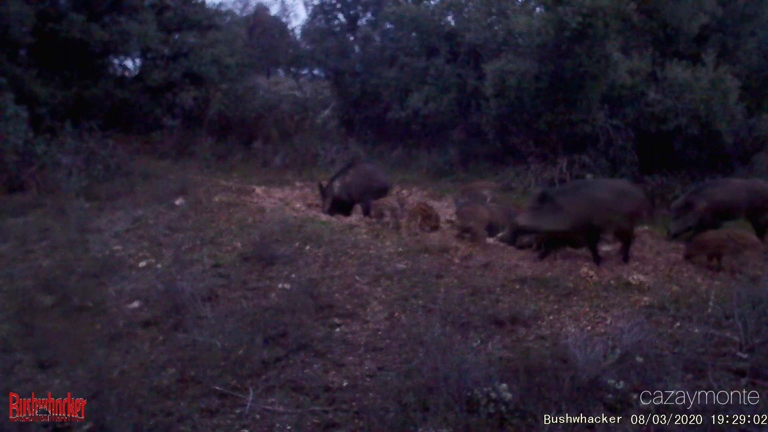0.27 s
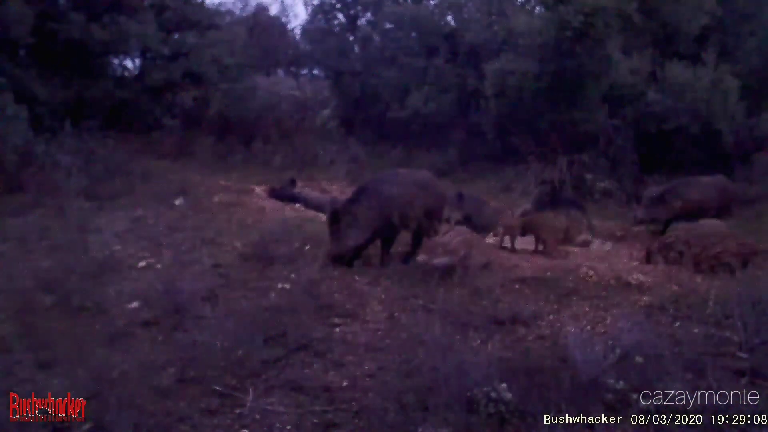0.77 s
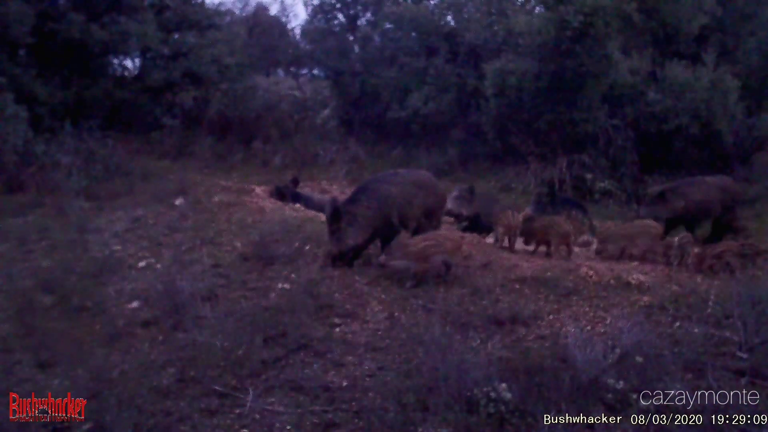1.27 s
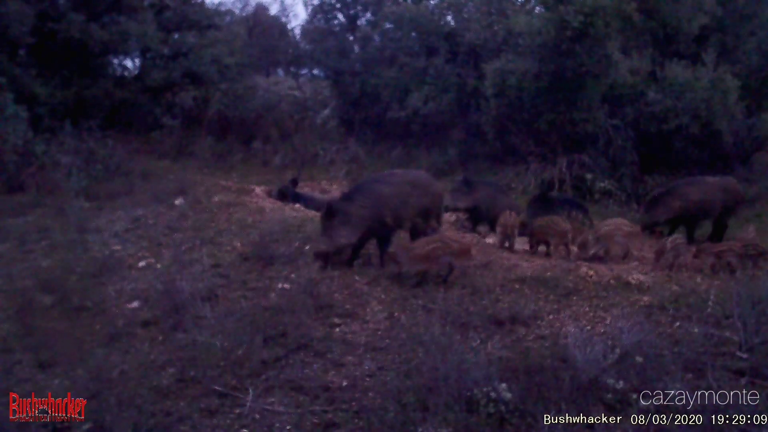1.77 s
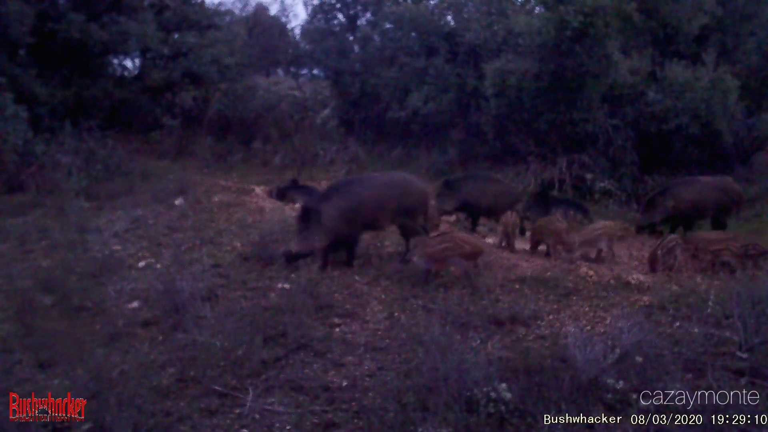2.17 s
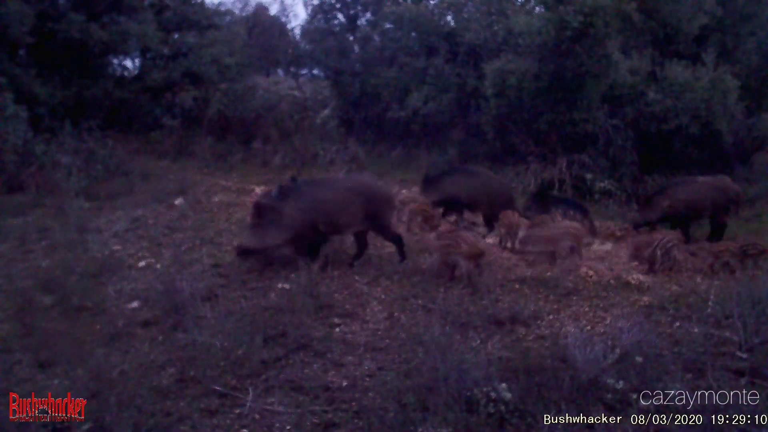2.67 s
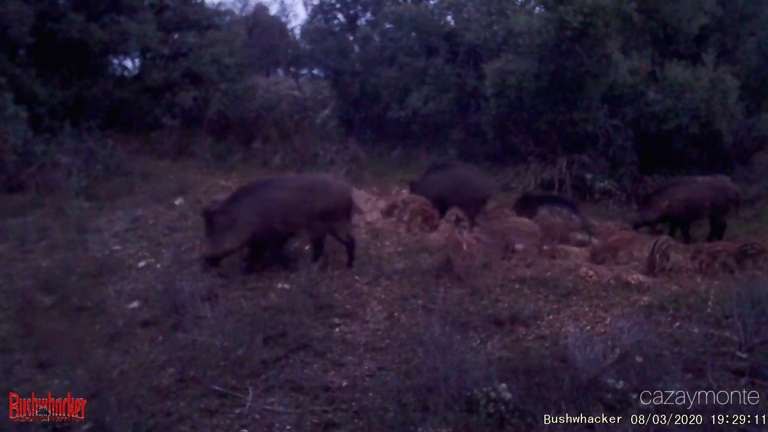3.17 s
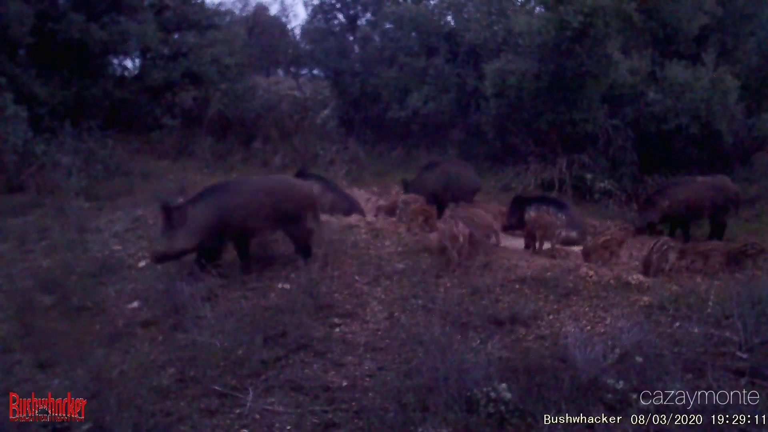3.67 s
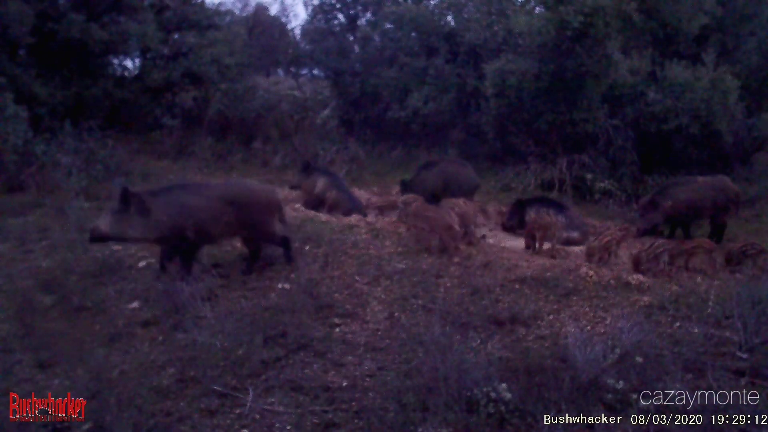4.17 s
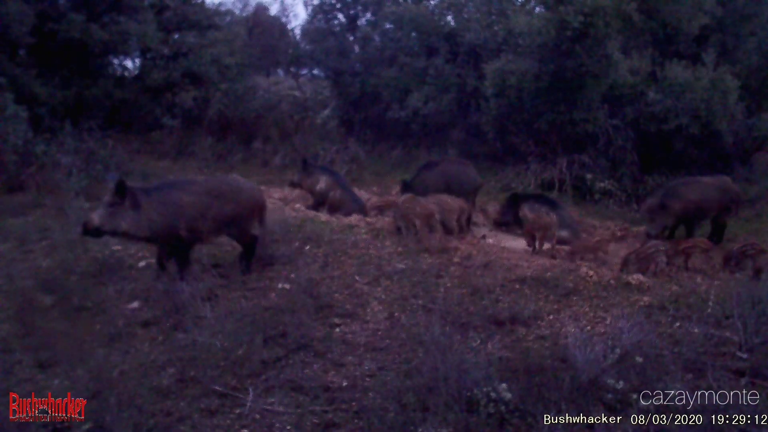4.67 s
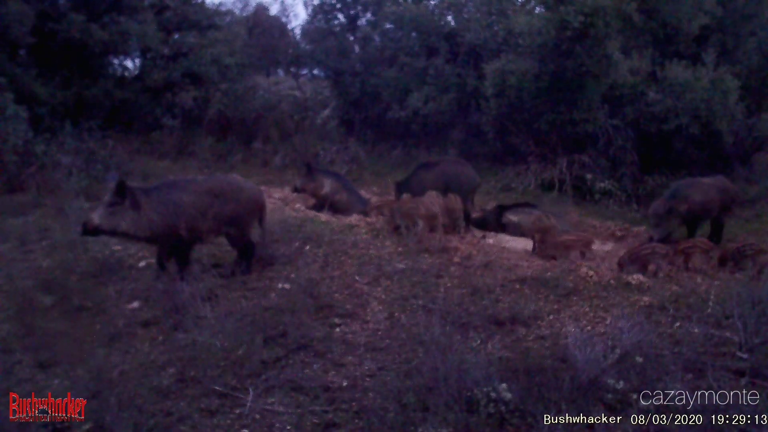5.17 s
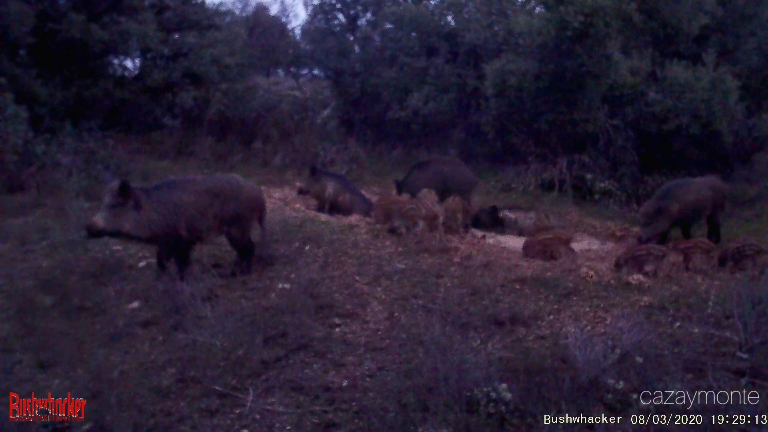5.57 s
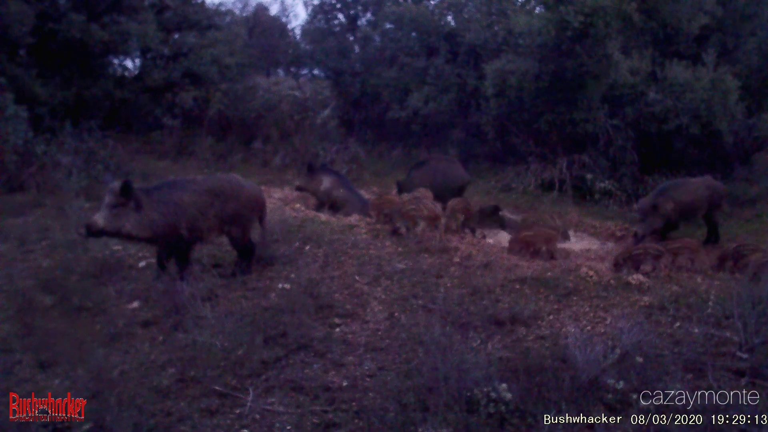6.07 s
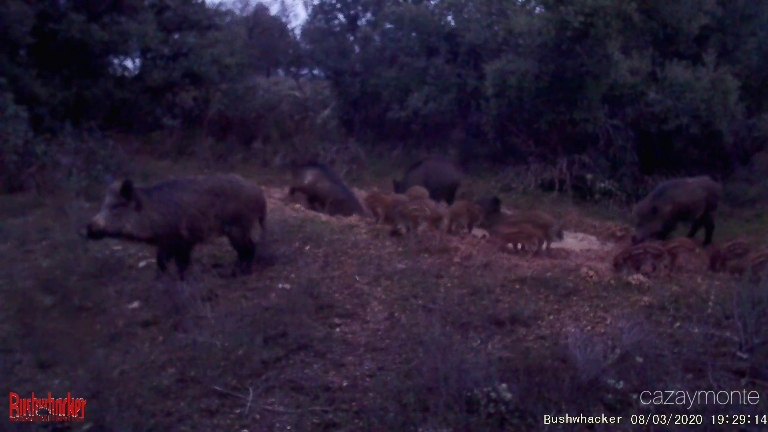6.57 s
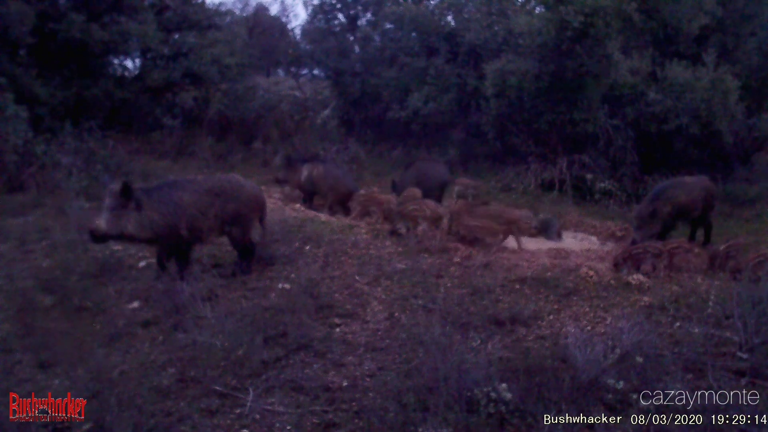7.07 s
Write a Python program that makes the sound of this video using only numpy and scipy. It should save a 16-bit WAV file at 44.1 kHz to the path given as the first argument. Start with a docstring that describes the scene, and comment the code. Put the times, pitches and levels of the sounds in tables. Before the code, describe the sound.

A still evening outdoors, with steady soft microphone hiss beneath a herd of wild boars and piglets stirring a mud hole some way off. It begins with faint wet shuffling and light ticks; around 0.65 s a small sucking squeak rises. At 1.0 to 1.3 s hooves or snouts make a sharp cluster of smacks, plops and sloshes. It calms, then mud squelches and snaps again around 2.2 to 2.5 s. Scattered spatters and drips follow, with a faint, husky low call at 3.3 s and more small smacks near 4 s. A short low grunt falls in pitch at 4.7 s. Wet crackling thickens after 5 s. About 5.85 to 6.1 s one animal heaves through the water with the loudest splash and smack, ebbing into gurgles. A breathy, hissing snort blows at roughly 6.75 to 7 s, then a few last plops and spatters.

```python
"""Wild boars in a mud hole

Wild boars and piglets wallow some way from a trail camera, on a still evening.
Hooves and snouts churn the water: swarms of damped rings and shaped noise gurgle, crackle and spatter.
Mud smacks as torn noise in a small cavity and plops as short unsteady tones; one animal heaves through the water.
Another snorts, noise ringing throat and nose; mud and a low grunt slide in pitch, and a faint call holds its own.
The thicket returns a short echo, and the camera's single microphone adds a steady hiss."""
import sys
import numpy as np
from scipy import signal
from scipy.fft import rfft, irfft, next_fast_len
from scipy.io import wavfile
from scipy.ndimage import map_coordinates

SR = 44100
rng = np.random.default_rng(int(sys.argv[2]) if len(sys.argv) > 2 else 0)


def generate_wav(signal):
    """Clip the signal to [-1, 1] and save it as 16-bit WAV at the path in sys.argv[1]."""
    frames = np.transpose(np.atleast_2d(signal))
    scaled = np.clip(frames, -1, 1) * 32767
    pcm = np.round(scaled).astype(np.int16)
    wavfile.write(sys.argv[1], SR, pcm)


N = 321930


def amp(db):
    """Decibels to gain."""
    return 10 ** (np.asarray(db) / 20)


def unit(x):
    """Scale to rms 1."""
    return x / np.sqrt(np.mean(x ** 2) + 1e-20)


def curves(rows):
    """One value per sample for each column after the time."""
    s, *columns = np.transpose(rows)
    return [np.interp(np.arange(N) / SR, s, column) for column in columns]


def noise(size=N):
    """White noise at rms 1."""
    return rng.standard_normal(size)


def wobble(rate, size=N):
    """A smooth random curve, rate knots a second."""
    knots = rng.standard_normal(int(size * rate / SR) + 4)
    return map_coordinates(knots, [np.arange(size) * rate / SR])


def filtered(x, response):
    """x times a response of frequency, padded so that its ringing does not wrap round."""
    m = next_fast_len(len(x) + SR // 10)
    f = np.fft.rfftfreq(m, 1 / SR)
    return irfft(rfft(x, m) * response(f), m)[:len(x)]


def coloured(x, spectrum):
    """x shaped by (frequency [Hz], level [dB]) points on a log axis, at rms 1."""
    hz, db = np.transpose(spectrum)
    return unit(filtered(x, lambda f: amp(np.interp(np.log(f + 1), np.log(hz), db))))


def resonance(f, hz, width):
    """Response of one damped resonator."""
    return 1j * f * width / (hz * hz - f * f + 1j * f * width)


def fade(t, t60):
    """Exponential decay by 60 dB in t60 seconds."""
    return np.exp(-np.log(1000) * t / t60)


def settling(t, length, attack, t60):
    """Build up from t = 0 with time constant attack, hold for length, then die away."""
    build_up = 1 - np.exp(-np.maximum(t, 0) / attack)
    return build_up * fade(np.maximum(t - length, 0), t60)


def add(track, s, sound):
    """Mix a sound into the track at time s."""
    part = track[round(s * SR):][:len(sound)]
    part += sound[:len(part)]


def bubbles(rate, low_hz, high_hz, cycles, rise, spread_db, size):
    """A swarm of damped rings of random pitch and strength; with rise, each climbs as its bubble nears the surface."""
    when, pitch, life, strength = rng.random((int(rate * N / SR), 4)).T[:, :, None]
    hz = low_hz * (high_hz / low_hz) ** pitch
    t = np.arange(size) / SR
    t60 = cycles * (.5 + life) / hz
    ring = np.sin(2 * np.pi * hz * t * (1 + rise * t / t60)) * fade(t, t60)
    gain = amp(spread_db * strength ** 2) * np.sqrt(hz)
    places = (when * N).astype(int) + np.arange(size)
    return np.bincount(places.ravel(), (gain * ring).ravel(), N)[:N]


# the quiet of the wood and the microphone's hiss: (frequency [Hz], relative level [dB per Hz])
QUIET_SPECTRUM = [(20, -0.5), (130, -4), (300, -10), (850, -16), (1050, -19.5), (3500, -20.5),
                  (6500, -21.5), (9000, -20.5), (15500, -23.5)]


def quiet(level_db=-66.0):
    """Steady noise shaped like the still wood and the microphone's own hiss."""
    return amp(level_db) * coloured(noise(), QUIET_SPECTRUM)


def thicket(x, t60=0.16):
    """Ground and bushes scatter a short echo, a decaying noise tail."""
    t = np.arange(SR // 2) / SR
    tail = noise(len(t)) * fade(t, t60)
    return signal.fftconvolve(x, tail / np.linalg.norm(tail))[:N]


# a faint, low call held on one pitch: attack is a time constant, fade the time to fall by 60 dB
CALL_START_S, CALL_HOLD_S, CALL_ATTACK_S, CALL_FADE_S = 3.315, 0.043, 0.016, 0.6
CALL_HZ, CALL_DB = 367, -66  # both before a random waver


def low_call(waver=0.034, flutter_db=4.0):
    """A soft, husky tone that swells and dies away; random waver of pitch and level makes it husky."""
    t = np.arange(N) / SR
    hz = CALL_HZ * (1 + waver * wobble(150))
    phase = 2 * np.pi * np.cumsum(hz) / SR
    envelope = settling(t - CALL_START_S, CALL_HOLD_S, CALL_ATTACK_S, CALL_FADE_S)
    return amp(CALL_DB + flutter_db * wobble(60)) * envelope * np.sin(phase)


# sucking mud and a low grunt (at 4.719 s), sliding in pitch:
# (time [s], length [s], starting pitch [Hz], final pitch [Hz], level before the swell [dB])
PITCH_GLIDES = [(0.648, 0.057, 858, 1624, -56), (2.218, 0.017, 720, 1110, -53),
                (2.253, 0.025, 1250, 1730, -55.5), (3.122, 0.052, 1990, 1053, -58.5),
                (3.905, 0.04, 835, 2250, -60.5), (4.719, 0.042, 330, 190, -54),
                (4.783, .04, 1760, 2000, -63), (4.88, 0.029, 856, 824, -56)]


def glides(waver=0.048, flutter_db=3):
    """Sucking mud and a low animal grunt: soft, fluttering tones that swell, slide and waver."""
    out = np.zeros(N)
    for s, length, from_hz, to_hz, db in PITCH_GLIDES:
        u = np.linspace(0, 1, int(length * SR))
        slide_hz = from_hz + (to_hz - from_hz) * u
        hz = slide_hz * (1 + waver * wobble(254)[:len(u)])
        swell = np.sin(np.pi * u) * unit(amp(flutter_db * wobble(138)[:len(u)]))
        add(out, s, amp(db) * swell * np.sin(2 * np.pi * np.cumsum(hz) / SR))
    return out


def blown(resonances):
    """Turbulent air ringing a set of resonances, added with alternating sign, at rms 1."""
    def tract(f):
        return sum((-1) ** k * amp(db) * resonance(f, hz, width)
                   for k, (hz, width, db) in enumerate(resonances))
    return unit(filtered(noise(), tract))


# one blow of air through the snout; the level is a gain on throat and hiss together
SNORT_START_S, SNORT_DB = 6.752, -34
SNORT_ATTACK_S, SNORT_HOLD_S, SNORT_RELEASE_S = 0.077, 0.032, 0.14
# throat resonances before they shift with its tightening: (frequency [Hz], width [Hz], level [dB])
THROAT_RESONANCES = [(303, 204, -5), (860, 74, 3.5), (1526, 133, 0.5), (2250, 240, -1), (3130, 80, -3),
                     (3460, 88, -2)]
# resonances of the narrow nasal passages, before the quiver: (frequency [Hz], width [Hz], level [dB])
NOSE_RESONANCES = [(4100, 71, -3.5), (4660, 115, 3), (5340, 140, 1), (5765, 260, -1), (7100, 174, 0.5),
                   (7500, 165, 0.5), (8570, 300, 2.5), (10850, 220, -13)]
# air hissing at the nostrils: (frequency [Hz], relative level [dB per Hz])
NOSTRIL_SPECTRUM = [(100, -25), (300, -18), (1100, -14), (4000, -1), (6500, 8.5), (10000, -2.5),
                    (13000, -9), (16000, -26)]


def snort(bend=0.0061, tighten=.085, brighten=0.24):
    """A boar clears its snout: unvoiced air rings the tightening throat and the nose, and hisses at the nostrils."""
    t = np.arange(N) / SR
    knees = SNORT_START_S + np.cumsum([0, SNORT_ATTACK_S, SNORT_HOLD_S, SNORT_RELEASE_S])
    blow = np.sin(np.pi / 2 * np.interp(t, knees, [0, 1, 1, 0])) ** 2
    # the soft walls quiver, and the throat's resonances climb through the blow
    quiver = 1 + bend * wobble(30)
    climb = tighten * np.interp(t, [knees[0], knees[2], knees[3]], [-1, 0, 1])
    # reading the noise at a varying speed shifts its resonances
    throat = map_coordinates(blown(THROAT_RESONANCES), [np.cumsum(quiver + climb)], mode="mirror")
    nose = map_coordinates(blown(NOSE_RESONANCES), [np.cumsum(quiver)], mode="mirror")
    nostrils = coloured(noise(), NOSTRIL_SPECTRUM)
    # nose and nostrils grow faster than the throat, so the peak of the blow is brightest
    hiss = (amp(-4.5) * nose + amp(-8.0) * nostrils) * blow ** brighten
    flutter = amp(0.96 * wobble(250))
    return amp(SNORT_DB) * blow * flutter * (amp(-6.5) * throat + hiss)


# the herd's constant shuffling in the mud: (time [s], spatter level [dB])
SHUFFLING = [(0, -66.5), (.85, -72.5), (1.5, -67), (2.05, -66.5), (2.7, -63), (3.75, -67), (4.25, -71.5),
             (4.95, -60), (5.8, -63), (6.6, -63), (7.3, -59)]
SHUFFLE_WATER_DB = -7  # its slosh, relative to its spatter
# a hoof or snout pushes through the mud:
# (time [s], length [s], sloshing water level [dB], spattering mud level [dB])
MUD_STROKES = [(0.185, 0.05, -67.5, -59.5), (0.593, 0.099, -64, -58.5), (0.97, 0.012, -56, -55),
               (1.035, 0.076, -56, -53), (1.128, 0.045, -51, -47.5), (1.256, 0.032, -55.5, -52),
               (2.15, 0.12, -64.5, -57.5), (2.295, 0.021, -56, -43.5), (2.372, 0.028, -52.5, -45),
               (2.412, 0.083, -64.5, -53.5), (2.556, 0.019, -64.5, -52.5), (2.78, 0.13, -78, -59),
               (3.059, 0.079, -69, -53), (3.188, 0.12, -66.5, -58.5), (3.486, 0.22, -62.5, -59),
               (3.766, 0.024, -62, -57), (3.837, 0.081, -64, -54.5), (3.94, 0.097, -71.5, -58),
               (4.32, 0.025, -69, -55), (4.491, 0.2, -64, -61), (4.994, 0.052, -59, -56.5),
               (5.102, 0.052, -61, -64), (5.226, 0.21, -63.5, -61), (5.467, 0.043, -55, -51),
               (5.706, 0.017, -60.5, -54), (5.913, 0.12, -53.5, -51), (6.025, 0.026, -39, -33),
               (6.19, 0.047, -54, -50), (6.329, 0.019, -52.5, -56), (6.978, .22, -64.5, -69)]
STROKE_ATTACK_S, STROKE_SETTLE_S = .011, 0.22  # time constant of the build-up; time to settle by 60 dB
# one animal heaves through the water: the wave builds up to its crest, then runs back slowly
WAVE_START_S, WAVE_ONSET_S, WAVE_CREST_S = 5.84, 0.026, 6.026
WAVE_WATER_DB, WAVE_MUD_DB = -49, -44.5  # at the crest
WAVE_RISE_DB_PER_S, WAVE_EBB_DB_PER_S = 60, 36


def stirring():
    """Levels in dB of sloshing water and spattering mud: shuffling, strokes and the wave add up in power."""
    t = np.arange(N) / SR
    shuffle_db, = curves(SHUFFLING)
    power = amp(shuffle_db + np.array([[SHUFFLE_WATER_DB], [0]])) ** 2
    for s, length, water_db, mud_db in MUD_STROKES:
        push = settling(t[:SR], length, STROKE_ATTACK_S, STROKE_SETTLE_S)
        add(power[0], s, (amp(water_db) * push) ** 2)
        add(power[1], s, (amp(mud_db) * push) ** 2)
    rising_db = WAVE_RISE_DB_PER_S * (WAVE_CREST_S - t)
    ebbing_db = WAVE_EBB_DB_PER_S * (t - WAVE_CREST_S)
    onset = np.clip((t - WAVE_START_S) / WAVE_ONSET_S, 0, 1)
    wave = amp(-np.maximum(rising_db, ebbing_db)) * onset
    power += (amp([[WAVE_WATER_DB], [WAVE_MUD_DB]]) * wave) ** 2
    return 10 * np.log10(power)


def stirred(grains, level_db, merge_db, spectrum):
    """Separate grains when gently stirred; above merge_db they run together into a wash."""
    merged = 1 / (1 + amp(merge_db - level_db))
    separate = np.sqrt(1 - merged) * coloured(grains, spectrum)
    wash = np.sqrt(merged) * coloured(noise(), spectrum)
    return amp(level_db) * (separate + wash)


def drips(spatter_db):
    """Single drops fall from wet coats, louder while the mud flies."""
    drops = bubbles(rate=70, low_hz=3200, high_hz=8000, cycles=24, rise=.03, spread_db=15, size=1024)
    return amp(spatter_db - 10.5) * unit(drops)


def squelch(slosh_db, db=-7):
    """Churned mud bursts in a dense crackle of dead, wet ticks."""
    ticks = bubbles(rate=300, low_hz=600, high_hz=3000, cycles=7, rise=0, spread_db=18, size=640)
    return amp(db + slosh_db) * unit(filtered(ticks, lambda f: resonance(f, 1423, 3400)))


def gulps(slosh_db, db=-3, onset_db=-60, low_cut_hz=300):
    """The harder the water is churned, the more it folds in big, low bubbles."""
    swarm = bubbles(rate=170, low_hz=291, high_hz=1049, cycles=31, rise=0.091, spread_db=11.5, size=2400)
    swarm = filtered(swarm, lambda f: f * f / (f * f + low_cut_hz ** 2))
    folding = 1 / (1 + amp(onset_db - slosh_db) ** 2)
    return amp(db + slosh_db) * folding * unit(swarm)


# sloshing water: (frequency [Hz], relative level [dB per Hz])
SLOSH_SPECTRUM = [(60, -57), (200, -0.5), (500, -5), (900, -3.5), (2000, 2), (3200, -0.5), (6000, -21.5)]
# spattering mud: (frequency [Hz], relative level [dB per Hz])
SPATTER_SPECTRUM = [(1200, -20), (3000, -12.5), (4200, -7.5), (4800, -4), (6900, 0), (9000, -10.5),
                    (12000, -15), (16000, -57)]


def churn():
    """Stirred water gurgles in bubbles while fine mud spatters and crackles above it."""
    slosh_db, spatter_db = stirring()
    gurgle = bubbles(rate=600, low_hz=320, high_hz=3304, cycles=24, rise=0.13, spread_db=15, size=1200)
    crackle = bubbles(rate=700, low_hz=3235, high_hz=11810, cycles=54.0, rise=0, spread_db=18.5, size=256)
    water = stirred(gurgle, slosh_db, merge_db=-53.5, spectrum=SLOSH_SPECTRUM)
    fizz = unit(crackle) + noise()
    mud = stirred(fizz, spatter_db, merge_db=-47.5, spectrum=SPATTER_SPECTRUM)
    clumps = unit(amp(1.7 * wobble(70) + 1.37 * wobble(400)))  # mud comes loose in clots
    return clumps * (water + mud) + squelch(slosh_db) + drips(spatter_db) + gulps(slosh_db)


# air pockets opening in the mud, the lowest mere thumps:
# (time [s], peak level before the bass cut [dB], middle pitch [Hz], decay by 60 dB [s])
AIR_POCKETS = [(0.6554, -45.5, 1256, 0.033), (1.0693, -35.5, 174, 0.017), (1.1, -35, 2340, 0.018),
               (1.1389, -32.5, 400, 0.062), (1.162, -38, 400, .05), (1.1405, -36, 733, 0.043),
               (1.173, -35.5, 1440, 0.035), (1.24, -48, 2700, .018), (1.2828, -35.5, 784, 0.01),
               (2.3954, -44, 450, 0.011), (2.434, -40.5, 2000, .011), (2.89, -51, 230, 0.029),
               (2.922, -52.5, 257, 0.031), (3.535, -40.5, 1705, 0.027), (3.6258, -42.5, 2100, 0.0132),
               (3.6443, -42, 1880, 0.013), (4.0635, -37.5, 2470, 0.0099), (4.396, -48, 2390, 0.03),
               (5.1184, -37, 582, 0.059), (5.0897, -41.5, 1950, .009), (5.862, -39.5, 1980, 0.0079),
               (6.036, -36.5, 294, .025), (6.086, -26.5, 1090, 0.01), (6.2365, -41.5, 697, 0.024),
               (6.2834, -40.5, 408, 0.019), (6.3587, -42, 897, 0.058), (7.035, -47.5, 1360, 0.031),
               (7.11, -46.5, 680, 0.017), (7.208, -39.5, 927, 0.038)]


def plops(rise=0.0545, rough=0.3, low_cut_hz=110):
    """Each air pocket rings briefly; its soft walls make the pitch unsteady."""
    out, t = np.zeros(N), np.arange(SR // 10) / SR
    for s, db, hz, t60 in AIR_POCKETS:
        drift = np.cumsum(noise(len(t))) * np.sqrt(hz / SR)
        phase = 2 * np.pi * hz * t * (1 + rise * (t / t60 - .5)) + 2 * rough * drift
        envelope = fade(t, t60) * (1 - np.exp(-t / 0.0006))
        add(out, s, amp(db) * np.sin(phase) * envelope / envelope.max())
    return filtered(out, lambda f: 1j * f / (low_cut_hz + 1j * f))  # a small pocket radiates little bass


# wet mud snapping under hooves and snouts:
# (time [s], level before a common trim [dB], cavity pitch [Hz], nominal decay by 60 dB [s])
MUD_SNAPS = [(0.045, -44, 3870, 0.033), (0.622, -39, 5950, 0.014), (0.972, -39.5, 6300, 0.016),
             (1.07, -25.5, 6350, 0.02), (1.069, -31, 3400, 0.011), (1.15, -30, 5550, 0.011),
             (1.1738, -21, 5000, 0.015), (1.174, -29, 2670, 0.01), (1.184, -32, 6100, 0.019),
             (2.203, -45, 7500, .012), (2.3126, -34, 6200, 0.06), (2.3132, -40.5, 1820, .04),
             (2.388, -40, 5600, 0.07), (2.3961, -29.5, 2280, 0.0081), (2.456, -43, 6100, 0.0275),
             (2.8072, -44, 4200, 0.051), (3.077, -45.5, 2040, 0.087), (3.268, -36, 6200, 0.025),
             (3.626, -38.5, 3480, 0.013), (3.6796, -36, 7650, 0.014), (3.893, -35, 5790, 0.017),
             (4.063, -32.5, 6450, 0.017), (4.268, -33.5, 7660, 0.0067), (4.318, -44, 4850, 0.031),
             (4.386, -41.5, 4660, 0.047), (4.874, -37.5, 4140, 0.02), (5.002, -39, 6000, 0.0153),
             (5.005, -45, 1750, 0.033), (5.135, -38.5, 6600, 0.029), (5.147, -44, 1450, 0.03),
             (5.2619, -32.5, 6260, 0.034), (5.298, -32, 7240, 0.015), (5.406, -35.5, 4200, 0.017),
             (5.5277, -39, 4830, 0.085), (5.9738, -28, 6100, 0.013), (6.0382, -26.5, 1730, .014),
             (6.0511, -30, 6800, 0.012), (6.064, -23.5, 9200, .01), (6.067, -16, 5400, 0.01),
             (6.0965, -26.5, 6200, .008), (6.292, -42, 990, 0.04), (6.359, -42, 1390, 0.043),
             (7.1278, -41.5, 6270, 0.041), (7.204, -42, 6540, 0.029)]


def smacks(attack_s=0.0014, tearing_db=3.0):
    """A film of mud tears in quick jerks: ticks in a small cavity, then a short spray of droplets."""
    out, t = np.zeros(N), np.arange(SR // 10) / SR
    for s, db, hz, t60 in MUD_SNAPS:
        spray = amp(-20) * fade(t, t60 * 4)
        envelope = (fade(t, t60 * 0.91) + spray) * (1 - fade(t, attack_s))
        jerks = amp(tearing_db * wobble(630, size=len(t)))

        def cavity(f):
            ringing = resonance(f, hz, hz * 0.14) + 0.14 * resonance(f, 5800, 2100)
            return ringing / (1 + (f / 11500) ** 4)  # dulled at the top

        snap = filtered(noise(len(t)) * jerks * envelope, cavity)
        add(out, s, amp(db - 3.0) * unit(snap) * np.sqrt(np.mean(envelope ** 2)))
    return out


def scene():
    """The herd and its echo over the quiet of the wood and the microphone's hiss, alike in both channels."""
    herd = low_call() + glides() + snort() + churn() + plops() + smacks()
    mono = quiet() + amp(-13.5) * thicket(herd) + herd
    return np.array([mono, mono])


def record(dry, top_hz=15750):
    """The camera keeps nothing above its band limit."""
    return np.array([filtered(channel, lambda f: f < top_hz) for channel in dry])


dry = scene()
out = record(dry)
generate_wav(out)
```